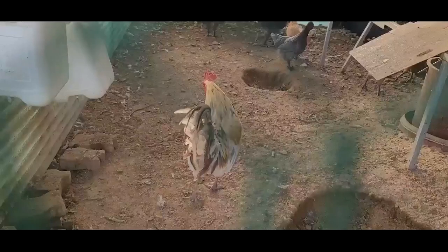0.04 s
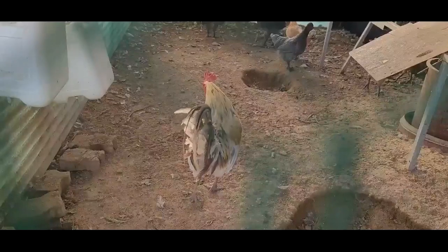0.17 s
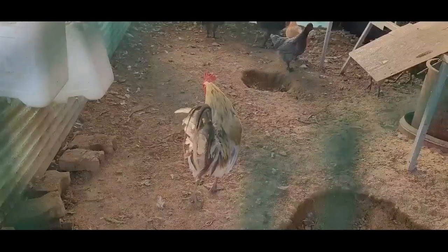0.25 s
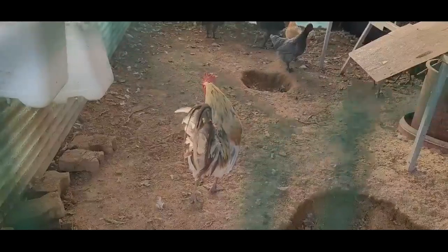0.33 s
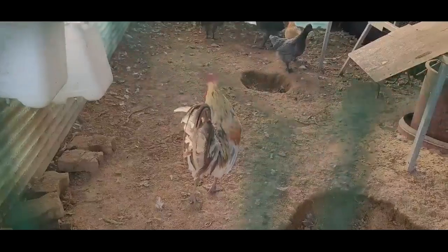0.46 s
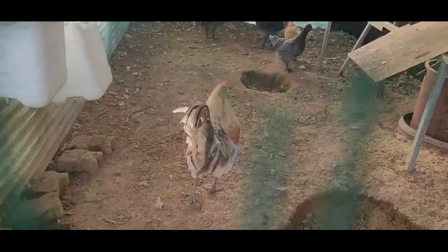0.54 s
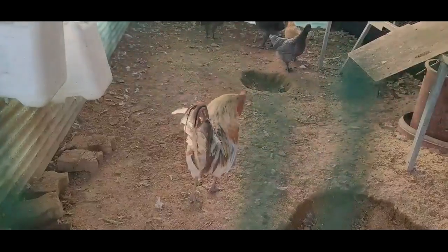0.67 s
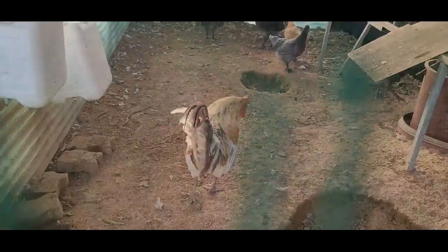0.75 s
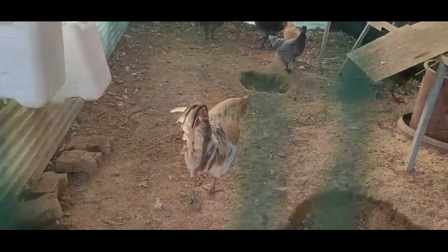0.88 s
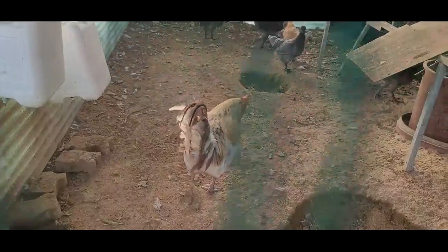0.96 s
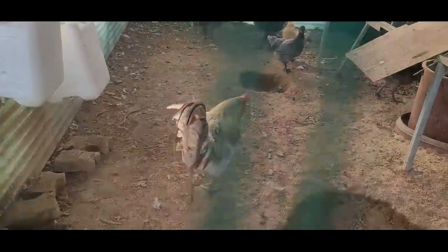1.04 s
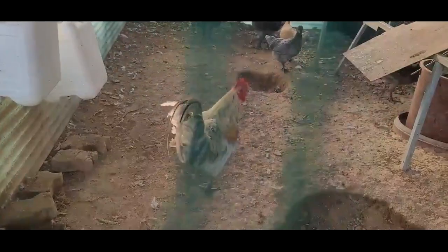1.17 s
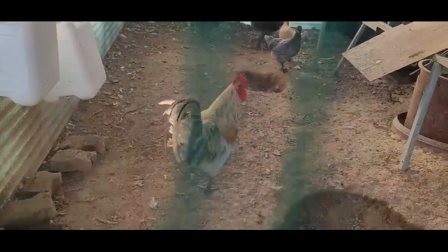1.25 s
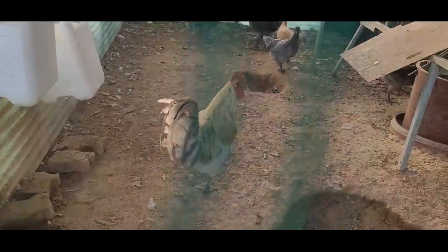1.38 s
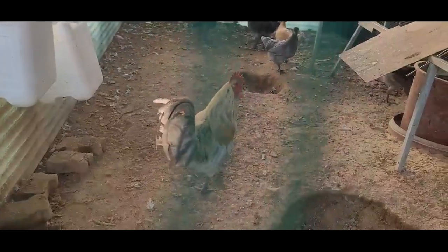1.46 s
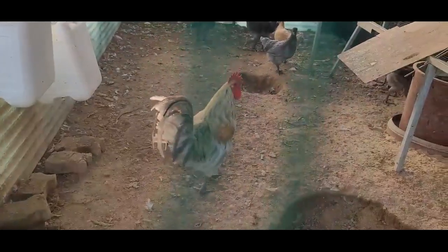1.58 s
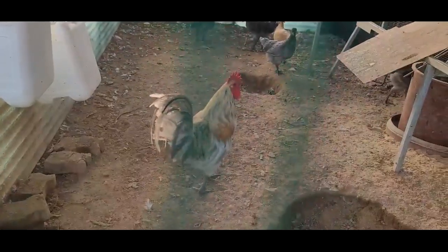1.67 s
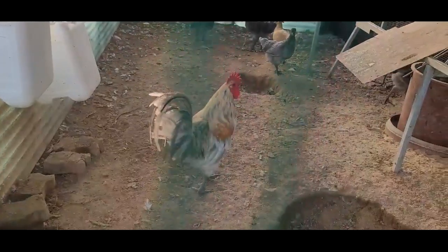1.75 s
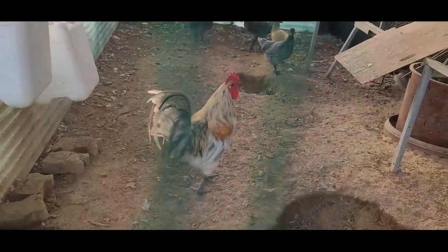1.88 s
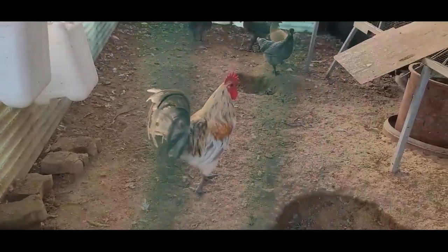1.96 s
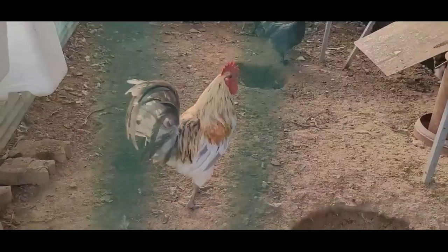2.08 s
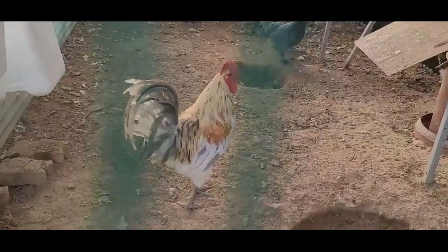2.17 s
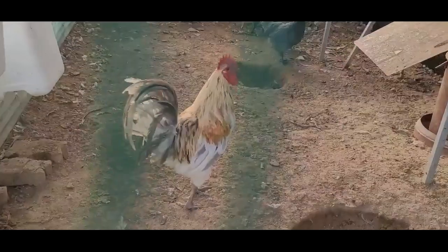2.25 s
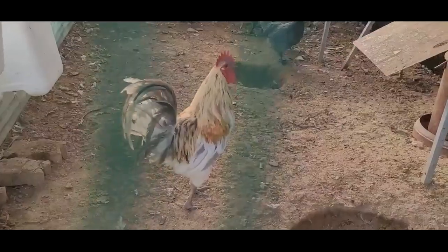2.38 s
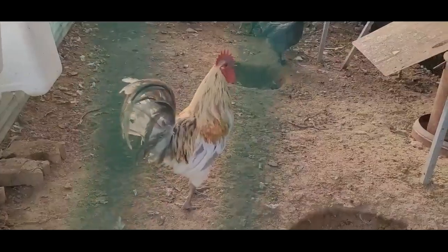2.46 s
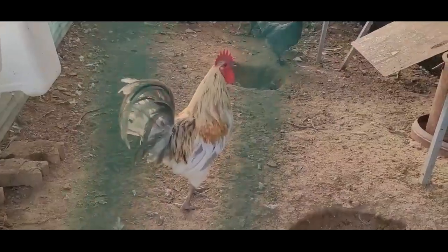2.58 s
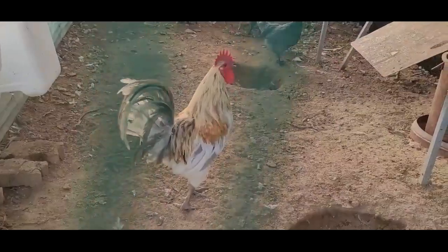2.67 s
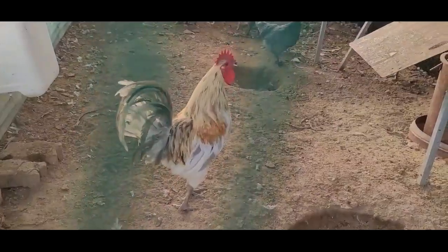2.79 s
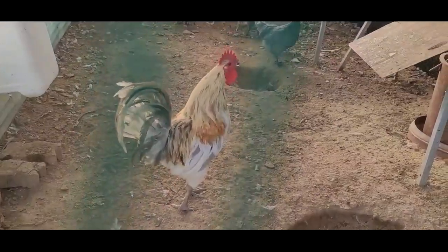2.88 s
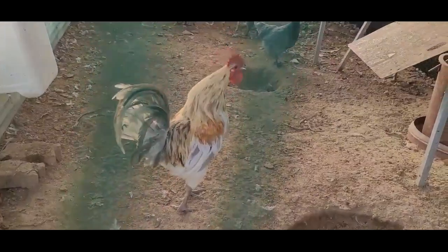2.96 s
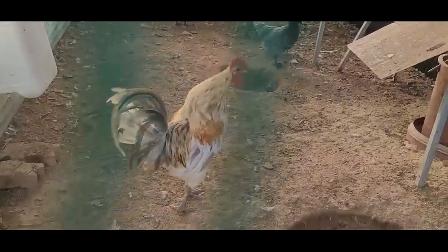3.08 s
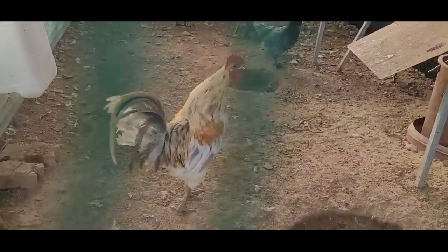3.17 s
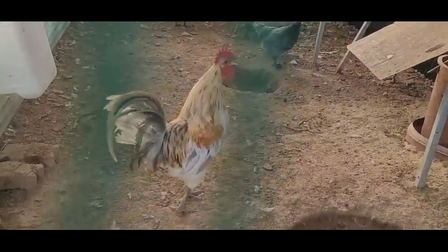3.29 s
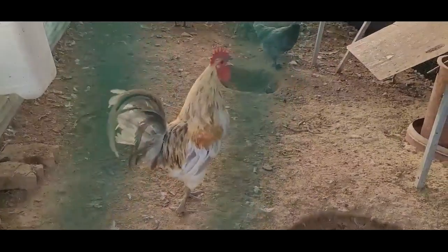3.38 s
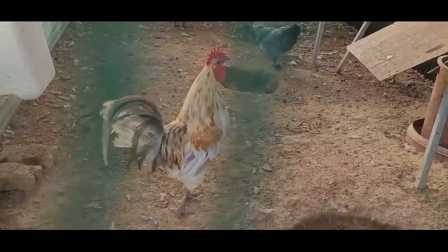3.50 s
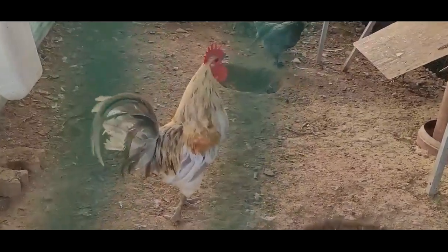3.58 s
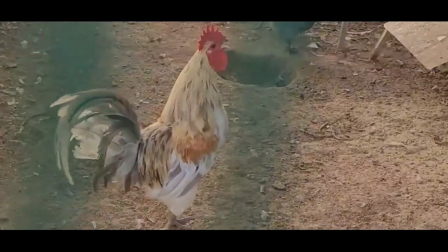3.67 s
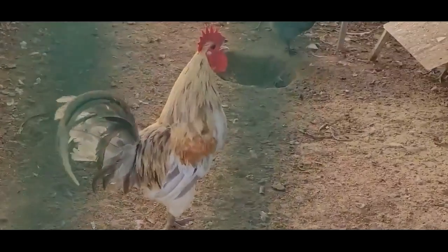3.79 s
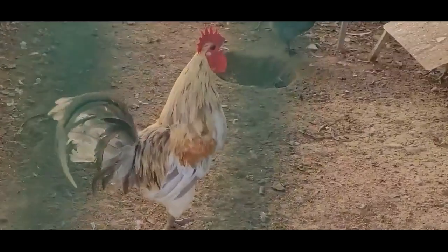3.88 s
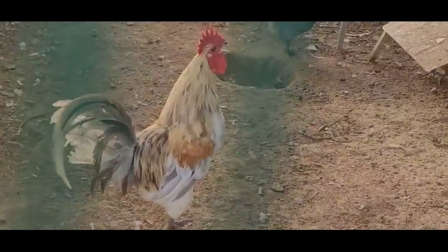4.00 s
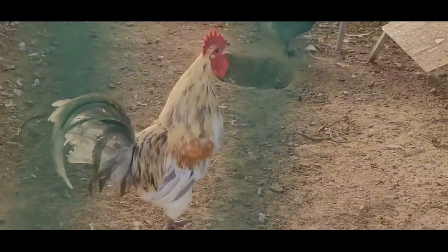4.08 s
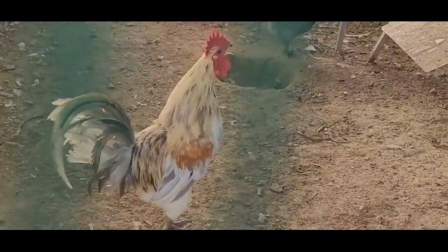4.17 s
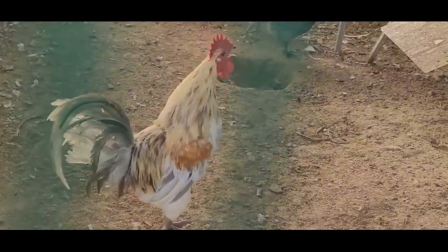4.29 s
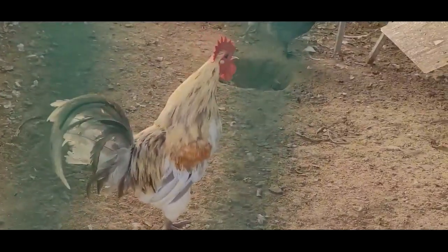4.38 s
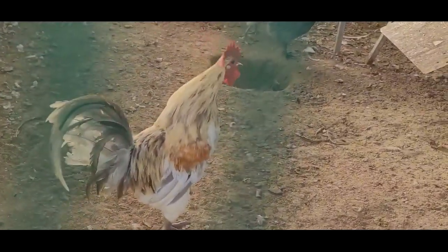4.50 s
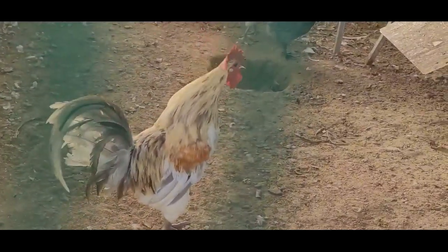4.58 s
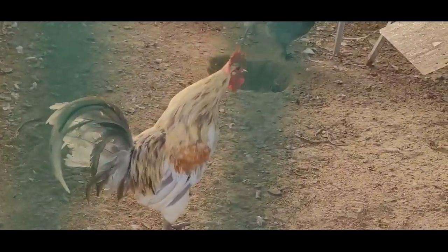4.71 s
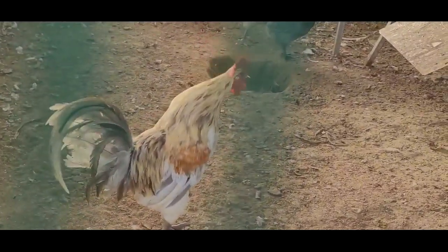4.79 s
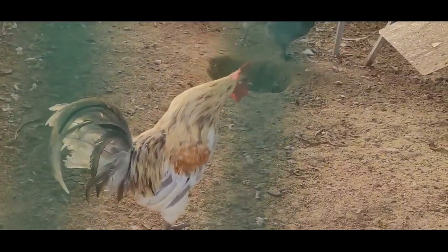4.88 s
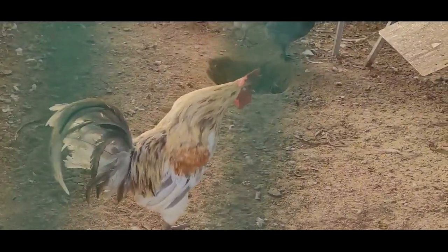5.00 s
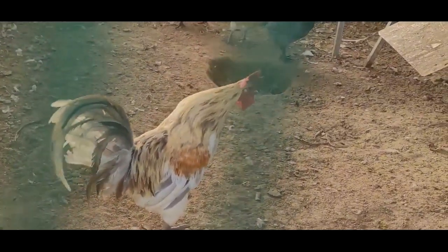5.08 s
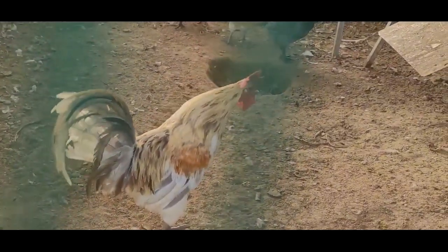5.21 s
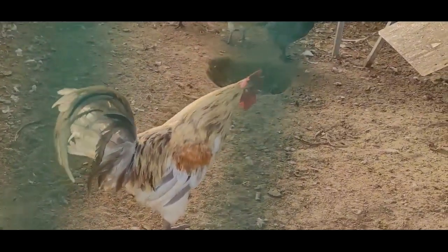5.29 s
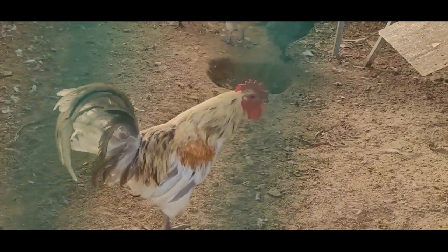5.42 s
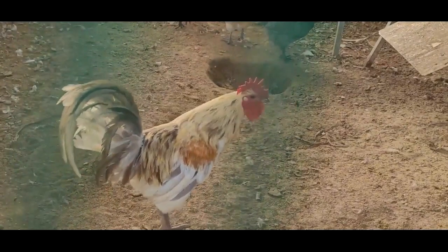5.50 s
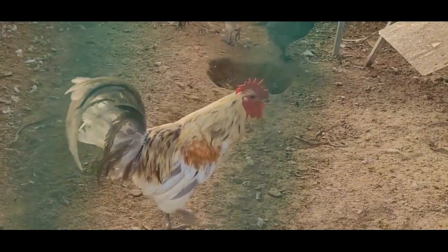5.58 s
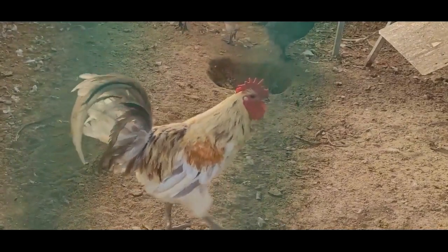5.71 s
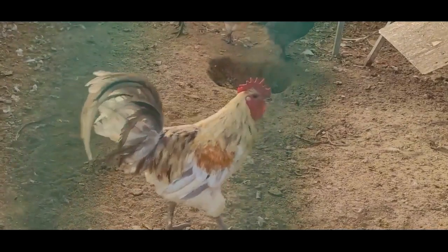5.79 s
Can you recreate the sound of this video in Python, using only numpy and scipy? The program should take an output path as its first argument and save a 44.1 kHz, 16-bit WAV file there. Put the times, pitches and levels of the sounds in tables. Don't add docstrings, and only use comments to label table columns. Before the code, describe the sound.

A hen clucks and squawks in a dirt pen, then a rooster lets out one loud hoarse crow that collapses into a rasp.

```python
import sys
import numpy as np
from scipy import signal
from scipy.fft import rfft, irfft
from scipy.io import wavfile
from scipy.ndimage import uniform_filter1d

SR = 44100
rng = np.random.default_rng(int(sys.argv[2]) if len(sys.argv) > 2 else 0)


def undo_db(level):
    steps = np.asarray(level, float) / 20
    return 10 ** steps


def dump_mix(stems):
    frames = np.atleast_2d(stems).T
    limited = np.clip(frames, -1, 1)
    pcm = np.round(limited * 32767).astype(np.int16)
    wavfile.write(sys.argv[1], SR, pcm)


N = 257984
CUTOFF_HZ = 15620
USUAL_DB = -20
AIR = 0.47


def rooster():
    # t/s, pitch/Hz, clean swing/dB, hoarseness against the swing/dB,
    # beak opening on the third line/dB
    crow_1 = [(3.106, 465, -67, -4, -3), (3.119, 508.5, -35, -5, 15), (3.143, 543, -25, -13, 21),
              (3.179, 561, -22.5, -24, 15), (3.21, 591.5, -18.5, -23, 0), (3.24, 586, -20, -13, -13.5),
              (3.284, 604.6, -18.5, -25, -7), (3.318, 588, -24.5, -18.5, 3), (3.364, 611, -45, -35, -5.5)]
    crow_2 = [(3.398, 697.7, -53.5, 6.5, -7.5), (3.412, 757.6, -29, 4, -10), (3.429, 823, -9.5, -22, 5),
              (3.482, 880, -8.5, -47, -11.5), (3.519, 892, -14, -28, 13.5),
              (3.553, 878.4, -13, -49.5, 16.5), (3.572, 791, -45.5, 10.5, 23.5), (3.624, 756, -25, -11, -3)]
    crow_3 = [(3.631, 853, -23, -6, 1), (3.66, 841.3, -19.5, -12.5, 0), (3.749, 824.5, -17.5, -20, -1.2),
              (3.77, 825, -17.5, -29, 2), (3.79, 837, -20, -43, -0.6), (3.81, 828, -22, -27.5, 2),
              (3.834, 818, -15, -27, -1.5), (3.87, 827, -15, -34, -1.49), (3.889, 814, -16.5, -23.5, -1)]
    crow_3_late = [(3.887, 829.6, -19.5, -30.5, -1), (3.928, 818.4, -14.5, -29, -1),
                   (3.956, 807, -27, -31, -4), (3.983, 810, -25, -42, 1), (4.026, 800, -30, -36, 7),
                   (4.053, 822, -14, -37, -1), (4.086, 823.5, -18, -36, 9.5),
                   (4.112, 813.4, -28, -16, 15.5), (4.127, 770, -42, -4, 18)]
    crow_4 = [(4.134, 774, -22.5, -16.5, -15.5), (4.204, 770.6, -37, 2, -4), (4.25, 776.4, -20, -24, -3),
              (4.303, 782.8, -20, -24, -5.5), (4.346, 774.2, -19.5, -29, -7), (4.43, 780.3, -21, -18, -6.5),
              (4.548, 784.2, -22.5, -8.5, -14), (4.614, 772, -19.5, -23, -12), (4.645, 766, -33, -9, -4)]
    crow_5 = [(4.63, 649.9, -36, 12.5, -7), (4.736, 629, -35.5, 11.5, 2), (4.844, 647.6, -27, 2, 18.5),
              (4.92, 631.9, -11.5, -12, 17), (4.997, 598, -25.5, 4, -21), (5.078, 585, -17, -11, -18),
              (5.1, 589, -42.5, 10.5, -3), (5.143, 595.4, -46.5, 17.5, 14.5), (5.191, 615, -64, 15.5, 0)]
    # f/Hz, width/Hz, level/dB
    crow_throat = [(693, 170, 4.5), (1420, 720, -1), (2640, 790, -7.5)]
    ending_throat = [(664.3, 188, 4), (1438.5, 505, -0.5), (2583, 480, -6.5)]
    # f/Hz, level per Hz/dB
    opening_top = [(1210, -63.5), (2050, -28), (2470, -6.5), (3230, -28), (3760, -11), (5230, -38),
                   (6850, -34.5), (12300, -47.5), (15400, -49)]
    crow_top = [(2500, -9), (3300, -3.5), (4120, 2), (4950, -9.5), (5770, -3), (7400, -13.5), (8250, -20),
                (9900, -23), (12300, -15), (15400, -27)]
    doubled_top = [(2700, -3), (3120, 1.5), (3500, -3.5), (3900, -0.5), (4300, -14), (4680, -5.5),
                   (5460, -15.5), (5850, -4.5), (6250, -15.5), (7000, -20.5), (8000, -13.5), (9300, -26),
                   (15400, -23)]
    ending_top = [(1710, -47), (2900, -5), (3730, 4), (5180, -13), (5950, -6.5), (9710, -17), (12300, -15),
                  (15400, -27.5)]
    # t/s, offset above the pitch/Hz, level/dB
    second_side = [(3.16, 43.93, -10), (3.199, 53, -1.5), (3.301, 51.4, 2), (3.34, 54, 2),
                   (3.36, 55.5, -56.5)]
    # multiple of the pitch, multiple of the gap, level/dB
    sum_tones = [(2, 1, -4), (3, 2, -18), (4, 3, -11)]
    # t/s, level/dB
    fifth_line = [(3.122, -48), (3.134, -21), (3.155, -39.5), (3.186, -22), (3.21, -44.5)]
    # t/s, pitch/Hz, level/dB
    split = [(4.645, 767.6, -28.5), (4.7, 752, -27), (4.76, 749.4, -25.5), (4.84, 717, -25.5),
             (4.89, 698, -30), (4.91, 677, -23)]
    # multiple of the pitch, level/dB
    split_lines = [(.87, -1), (1, -2), (1.5, -10), (1.83, -3), (2.0, 2), (2.2, -3), (2.32, -5.5), (3, -7.5),
                   (3.3, -3.5), (3.6, -7), (4.1, -10.5), (4.8, -16)]
    # t/s, third of the pitch/Hz, level/dB
    tripled = [(4.93, 202.3, -44), (4.955, 201.6, -31.5), (5.0, 198.7, -34), (5.05, 198.9, -24),
               (5.085, 195.4, -31.5), (5.11, 197.4, -44)]
    # multiple of that third, level/dB
    tripled_lines = [(4, -5), (6, -2), (7, 0), (8, 0.5), (9, -6), (12, -11.5), (13, -10), (14, -8)]
    # t/s, f/Hz, level/dB
    last_gasp = [(5.118, 880, -35), (5.135, 853, -35), (5.155, 845, -33.5), (5.175, 800, -45)]
    # t/s, f/Hz, level/dB
    voice_break = [(3.575, 613, -37), (3.605, 687, -20.5), (3.635, 684, -17.5), (3.67, 750, -30.5)]

    crow, first, turns = voice([("open", crow_1, 10, 0.65, 0, .0075, 3)],
                               crow_throat, opening_top, sputter_db=-0.5)
    gate, above_hz, side_db = in_time([np.array(second_side)])
    gap = np.cumsum(above_hz) / SR
    sums = [undo_db(db + 4 * drift(40)) * sine(k * turns + m * gap) for k, m, db in sum_tones]
    crow += gate * first * undo_db(side_db) * (sine(turns + gap) + sum(sums))
    gate, fifth_db = in_time([np.array(fifth_line)])
    crow += gate * undo_db(fifth_db + 3.7 * drift(80)) * sine(5 * turns)

    held = [("rise", crow_2, 12.5, .42, 0, .009, 3), ("hold", crow_3, 4.5, .83, 0, .0058, 3),
            ("hold", crow_3_late, 4, .92, 0, .004, 3), ("half", crow_4, -24, .97, 1, .0018, 3)]
    crow += voice(held, crow_throat, crow_top, doubled_top=doubled_top)[0]
    crow += undo_db(2.5 * drift(59)) * far_call([voice_break], [(1, 0)])
    crow += voice([("end", crow_5, 2, 0.55, 0, .007, 4)],
                  ending_throat, ending_top, fade=0.03, sputter_db=2.5)[0]
    crow += broken_lines(split, split_lines)
    crow += broken_lines(tripled, tripled_lines)
    return crow + broken_lines(last_gasp, [(1, -2.5), (1.07, -2)], flicker_db=10.5)


def voice(states, modes, top, fade=0.017, sputter_db=0, doubled_top=None):
    # t/s, rattle rise/dB, half length/s
    slips = [(3.814, 17, 0.0088), (3.896, 10, 0.011), (4.028, 28, 0.014), (4.091, -7.5, 0.021),
             (4.17, 30, 0.033)]
    # t of a crest/s, half length/s, rate/Hz, depth/dB
    throbs = [(3.458, 0.036, 40, 0.5), (3.728, 0.11, 43.3, 2.5), (4.439, 0.034, 40.2, 3)]
    time = np.arange(N) / SR
    rows = [np.array([[*row, *state] for row in partials(name, table)]) for name, table, *state in states]
    (gate, hz, db1, db2, db3, upper_db, between_db,
     rattle_db, clean, half, wobble, third) = in_time(rows, fade)
    turns = turns_of(hz, .55 * wobble)
    clean = np.clip(clean, 0, 1)
    half = half * (1 - np.exp(-((time - 4.325) / 0.04) ** 4))
    slips_db = sum(db * np.exp(-((time - s) / span) ** 2) for s, db, span in slips)
    throb_db = sum(db * np.cos(2 * np.pi * rate * (time - s)) * np.exp(-((time - s) / span) ** 4)
                   for s, span, rate, db in throbs)

    lines = undo_db(db1) * sine(turns)
    lines += undo_db(db2 - 0.13 * slips_db + throb_db) * sine(2 * turns)
    lines += undo_db(db3) * np.where(third > 3.5, sine(4 * turns), sine(3 * turns))
    between = undo_db(3 * drift(6)) * sine(1.5 * turns) + undo_db(3 * drift(6)) * sine(2.5 * turns)
    lines += half * undo_db(between_db) * (between + .07 * sine(turns / 2))
    lines *= undo_db(220 * wobble * np.tanh(drift(30)))
    upper = overtones(turns, hz * (gate > 0), top, half * undo_db(between_db + 36.5), wobble,
                      first=4 - half.any() / 2, count=30, rasp_db=531.0, blur=21, doubled_top=doubled_top)

    harsh = rattle(hz)
    chaos_db = between_db + rattle_db + slips_db
    low = undo_db(chaos_db) * rms_one(throat(harsh, modes, sputter_db))
    hiss = np.clip(undo_db(chaos_db - upper_db + 8), 45 * wobble, 1)
    hiss = hiss * rms_one(colour(harsh + AIR * rng.standard_normal(N), top))
    high = np.sqrt(clean) * upper + np.sqrt(1 - clean) * hiss
    brighter = undo_db(7.4 * np.exp(-((time - 4.96) / 0.046) ** 2)) - 1
    bright_band = signal.butter(2, (4770, 7060), "band", fs=SR, output="sos")
    high += brighter * signal.sosfilt(bright_band, high)
    return gate * (lines + low + undo_db(upper_db) * high), gate * undo_db(db1), turns


def partials(name, table):
    tone_db = {"open": (-20, -20, -29.5, -23), "rise": (-29.5, -22, -37.5, -32),
               "hold": (-22, -14.5, -41, -33.5), "half": (-25.5, -21.5, -18, -26.5),
               "end": (-20.5, -34.5, -38, -38.5), "squawk": (-39, -19.5, -41, -45)}
    follows = {"open": (1.24, 0.88, 1.27, 0.66), "rise": (1, 1, 0.66, 0.39),
               "hold": (0.46, 0.9, 0.15, 0.035), "half": (0.25, 0.36, 0.65, 0.91),
               "end": (0.89, 0.29, 0.42, 0.85), "squawk": (0.78, 1.3, 0.51, 1.53)}
    s, hz, swing_db, hoarse_db, beak_db = np.transpose(table)
    chaos_db = swing_db + hoarse_db
    breath_db = 10 * np.log10(undo_db(2 * swing_db) + undo_db(2 * (chaos_db + 10)))
    drives_db = [swing_db, swing_db, swing_db, breath_db]
    db1, db2, db3, upper_db = [level_db + share * (drive_db - USUAL_DB) for level_db, share, drive_db
                               in zip(tone_db[name], follows[name], drives_db)]
    return np.transpose([s, hz, db1, db2, db3 + beak_db, upper_db, chaos_db])


def overtones(turns, hz, top, half, wobble, first, count, rasp_db=300., blur=13., doubled_top=None):
    on = np.flatnonzero(hz > 0)
    out, power = np.zeros(N), 1e-12
    slow, fast = np.arange(0, N + 2000, 1800), np.arange(0, N + 2000, 200)
    for k in np.arange(first, count, .5 if half.any() else 1):
        line_hz = k * hz[on]
        gain = undo_db(np.where(half[on] > 0, at_hz(doubled_top or top, line_hz), at_hz(top, line_hz)))
        gain = gain * (half[on] if k % 1 else 1) * (line_hz < CUTOFF_HZ)
        fading = 3.5 * np.interp(on, slow, rng.standard_normal(len(slow)))
        rasp = np.interp(on, fast, rng.standard_normal(len(fast)))
        rasp = np.minimum(rasp_db * wobble[on], 3.5) * rasp
        slip = np.interp(on, fast, rng.standard_normal(len(fast))) / (2 * np.pi)
        slip = blur * k * wobble[on] * slip
        out[on] += gain * undo_db(fading + rasp) * sine(k * turns[on] + slip + rng.random())
        power = power + gain ** 2
    out[on] /= np.sqrt(power)
    return out


def rattle(hz):
    turns = np.cumsum(hz * undo_db(.12 * drift(150))) / SR
    pulses = np.diff(np.floor(turns), prepend=0)
    pattern = sum(drift(14) * sine(j * turns / 4 + rng.random()) for j in (0, 1, 1, 2))
    out = pulses * (pattern + .7 * rng.standard_normal(N))
    out /= np.sqrt(uniform_filter1d(out ** 2, size=700) + 1e-9)
    out += .35 * rng.standard_normal(N)
    return signal.sosfilt(signal.butter(6, 645, "high", fs=SR, output="sos"), out)


def throat(x, modes, sputter_db=0, rate=60):
    out = 0
    for k, (hz, width, level_db) in enumerate(modes):
        r = np.exp(-np.pi * width / SR)
        b = (1 - r * r) / 2 * np.array([1, 0, -1])
        a = [1, -2 * r * np.cos(2 * np.pi * hz / SR), r * r]
        catch = undo_db(sputter_db * np.tanh(drift(rate))) if sputter_db else 1
        ringing = signal.lfilter(b, a, signal.lfilter(b, a, x))
        out = out + (-1) ** k * undo_db(level_db) * catch * ringing
    return out


def broken_lines(table, orders, flicker_db=5.5, grain=420):
    gate, hz, level_db = in_time([np.array(table)], fade=0.0078)
    on, out = np.flatnonzero(gate), np.zeros(N)
    turns, steps = turns_of(hz, .006)[on], np.arange(on[0], on[-1] + grain, grain)
    for k, db in orders:
        catch = np.tanh(np.interp(on, steps, rng.standard_normal(len(steps))))
        out[on] += undo_db(db + flicker_db * catch) * sine(k * turns + rng.random())
    return gate * undo_db(level_db) * out


def hen():
    # t/s, pitch/Hz, clean swing/dB, hoarseness against the swing/dB, beak opening/dB
    squawk = [(1.308, 585, -48, 9.5, -9), (1.329, 590.3, -37, 16.5, -5), (1.35, 575.5, -38, 16, 11),
              (1.384, 561.4, -17, -6, 9), (1.408, 547.7, -29, 6, 12), (1.482, 522, -21.5, -2.5, -6),
              (1.5, 510, -27.5, -1, -11), (1.537, 489, -41.5, 5.5, -19)]
    # f/Hz, width/Hz, level/dB
    squawk_throat = [(666, 640, -2.5), (1160, 400, 3), (1570, 470, -3.5), (2300, 330, -21), (2630, 144, 3)]
    # f/Hz, level per Hz/dB
    hen_top = [(1120, -40), (1900, -25), (2150, -2.5), (2720, -1.5), (3070, -23), (3830, -9.5), (5580, -22),
               (6030, -16), (7780, -23), (8340, -22), (15400, -41.5)]
    # t/s, pitch/Hz, level/dB
    squawk_bands = [(1.325, 589, -44), (1.345, 585, -31), (1.39, 556.5, -37), (1.44, 538, -31.5),
                    (1.48, 527, -39.5), (1.52, 525, -49)]
    # multiple of the pitch, level/dB
    squawk_lines = [(4, -5), (4.5, -6), (5, -2), (7, -6.5), (7.5, -19), (11, -16)]
    out = clucks()
    out = out + undo_db(-25.5) * np.roll(out, int(0.058 * SR))
    squawking = [("squawk", squawk, -2.5, .6, 0, .012, 3)]
    out = out + voice(squawking, squawk_throat, hen_top, sputter_db=6.5)[0]
    return out + broken_lines(squawk_bands, squawk_lines)


def clucks():
    # t/s, hold/s, peak/dB, partial 2 f/Hz,
    # chest weight on partial 1/dB
    cluck_events = [
        (1.179, 0.0044, -23.5, 1272, -0.5),
        (1.314, 0.042, -21, 1449, -4),
        (1.669, 0.017, -23, 1369, 2),
        (1.891, 0.0024, -19.5, 1370, 1),
        (2.149, 0.0028, -22, 1317, -1),
        (2.448, 0.0029, -25, 1135, -1.5),
        (2.695, 0.0033, -15.5, 1404, 2),
        (2.931, 0.023, -22.5, 1321, -2),
        (3.581, 0.029, -27.5, 1392, -14),
        (5.332, 0.029, -24.5, 1462, -3),
    ]
    # f/Hz, width/Hz, level/dB
    hen_throat = [(690, 280, -4.5), (1136, 71, 11.5), (1392, 107, 10), (2290, 1380, -10), (2680, 630, -6.5)]
    # f/Hz, width/Hz, level/dB
    cluck_beak = [(2280, 460, 4), (3180, 330, 0.5), (3940, 120, -10.5), (5110, 150, -11.5)]
    # f/Hz, level per Hz/dB
    cluck_top = [(1030, -17.5), (1750, 5.5), (2350, -9), (2800, -5.5), (3200, -11.5), (3700, -9),
                 (4230, -15), (4760, -13.5), (5350, -13.5), (7710, -24.5), (12100, -45), (15400, -49)]
    # f/Hz, level on the upper partials/dB
    beak_ring = [(4400, -5), (3940, -10), (4200, -10.5), (4000, -5.5), (4350, -7.5), (4400, -8.5),
                 (4130, -2.5), (3970, -1.5), (4200, -4), (3920, -6)]
    # f/Hz, level per Hz/dB
    puff = [(120, -21), (200, -3.5), (480, 1), (700, -34)]
    tables = [cluck_rows(*row) for row in cluck_events]
    gate, hz, db2, db1, upper_db = in_time(tables, fade=0.0068)
    hz = uniform_filter1d(hz, size=900)
    db2 = uniform_filter1d(db2, size=500)
    turns, harsh = turns_of(hz / 2, 0.011), rattle(hz / 2)

    second = .7 * undo_db(2.5 * drift(90)) * sine(2 * turns) + 0.7 * rms_one(throat(harsh, hen_throat[1:3]))
    first = 0.059 * sine(turns) + 1.034 * rms_one(throat(harsh, hen_throat[:1]))
    first += undo_db(-18) * rms_one(colour(rng.standard_normal(N), puff))
    upper = .7 * overtones(turns, hz / 2 * (gate > 0), cluck_top, 0 * hz, 0.022 + 0 * hz, first=3, count=20)
    upper += 1.45 * rms_one(colour(harsh + AIR * rng.standard_normal(N), cluck_top))
    upper += 1.21 * rms_one(throat(harsh, cluck_beak, sputter_db=8.5, rate=7.1))
    rings = [np.array([[rows[0, 0], *ring], [rows[-1, 0], *ring]]) for rows, ring in zip(tables, beak_ring)]
    _, ring_hz, ring_db = in_time(rings)
    upper += 1.33 * undo_db(ring_db) * drift(160) * sine(turns_of(ring_hz, .012))
    return gate * (undo_db(db2) * second + undo_db(db1) * first + undo_db(upper_db) * upper)


def cluck_rows(s, hold, peak_db, hz, chest_db):
    start_db = np.array([-31.5, -13.5, -15.5])
    fall_db_per_s = np.array([470, 535, 391.5])
    tail_s = .06
    lift_db = 0.4 * (peak_db - USUAL_DB)
    rise = max(0.028 - 0.49 * hold, .005)
    top_db = np.array([peak_db, -24.5 + chest_db, -42.5 + lift_db])
    held_db = top_db + np.array([1, -2, 2.5])
    return np.array([[s, hz * 0.86, *(top_db + start_db)],
                     [s + .45 * rise, hz, *(top_db + 0.54 * start_db)],
                     [s + rise, hz, *top_db],
                     [s + rise + hold, hz, *held_db],
                     [s + rise + hold + tail_s, hz * 0.94, *(held_db - tail_s * fall_db_per_s)]])


def rustle():
    # t/s, level/dB
    scratch = [(2.272, -45), (2.43, -78)]
    gate, level_db = in_time([np.array(scratch)], fade=0.025)
    grains = rng.standard_normal(N) * undo_db(1.93 * drift(80))
    dull = [(300, -3.0), (600, 3.0), (1500, -17), (2600, -22), (5000, -33), (9000, -70)]
    return gate * undo_db(level_db) * rms_one(colour(grains, dull))


def walls(x):
    # f/Hz, level against the direct sound/dB
    width = [(60, -37), (150, -39), (380, -7), (950, -6), (2370, -5), (5960, 1.5), (14900, -3)]
    t = np.arange(SR // 3) / SR
    decay = undo_db(-60 * t / 0.093) + undo_db(-29 - 60 * t / 0.92)
    tails = rng.standard_normal((2, len(t))) * decay * (t > .002)
    front, side = [signal.fftconvolve(x, tail / np.linalg.norm(tail))[:N] for tail in tails]
    return x + undo_db(-13) * front + colour(side, width) * [[1], [-1]]


def far_birds():
    # t/s, length/s, first f/Hz, last f/Hz, level/dB
    far_crow = [(5.21, 0.248, 649, 673, -42), (5.44, 0.3, 669, 681, -39)]
    far_half = [(5.26, 0.11, 324.5, 365.6, -44.5), (5.36, 0.52, 327, 310, -53.5)]
    croon = [(2.2, 0.228, 205.8, 209.8, -58.5), (5.4, 0.3, 218.7, 230.6, -58.5)]
    far_clucks = [(.34, 0.085, 1033, 999, -53.5), (.53, 0.04, 1074, 1010, -55)]
    # t/s, length/s, level/dB
    insect = [(0.135, 0.35, -67.5), (1.596, 0.053, -70), (2.503, 0.26, -67)]
    crow = far_call(gliding_notes(far_crow), [(1, 0.0075)])
    crow = crow + far_call(gliding_notes(far_half), [(1, 0.0011)])
    hens = far_call(gliding_notes(croon), [(1, 7.1), (2, 4.5)])
    hens = hens + far_call(gliding_notes(far_clucks), [(.5, -2.5), (1, -0.5), (1.5, -7.5)])
    buzzes = [np.array([[s, db], [s + span, db]]) for s, span, db in insect]
    gate, level_db = in_time(buzzes, fade=0.026)
    buzz = rms_one(throat(rng.standard_normal(N), [(7350, 550, 0)]))
    return crow + hens + gate * undo_db(level_db) * buzz


def far_call(tables, orders):
    gate, hz, level_db = in_time([np.array(t) for t in tables], fade=0.021)
    turns = turns_of(hz, 0.0022)
    return gate * undo_db(level_db) * sum(undo_db(db) * sine(k * turns) for k, db in orders)


def gliding_notes(rows):
    at = np.array([0, 0.17, 1 - 0.19, 1])
    edge_db = np.array([-32, 0, 0, -32])
    return [np.transpose([s + span * at, first_hz + (last_hz - first_hz) * at, db + edge_db])
            for s, span, first_hz, last_hz, db in rows]


def yard_noise():
    # t/s, level/dB
    gusts = [(0.3, -43.5), (1.9, -43), (2.04, -48), (2.2, -42.5), (2.6, -43), (2.95, -40.5), (3.649, -46),
             (3.72, -38), (3.8, -46), (4.11, -45), (4.65, -42.5), (4.79, -53), (4.97, -42), (5.28, -47.5),
             (5.46, -47.5), (5.6, -52), (5.85, -43)]
    # t/s, lift of the murmur/dB
    stir = [(.8, 3), (2.1, 3), (5.3, 6.5), (5.6, 4.5)]
    # f/Hz, level per Hz/dB
    rumble_top = [(13, -35.5), (22, -6), (49, 1.5), (84, -5), (119, -13), (160, -20.5), (210, -15),
                  (350, -120)]
    # f/Hz, level per Hz/dB
    murmur_top = [(82, -44.5), (140, -10), (400, -9.5), (750, -15), (1500, -20.5), (2500, -31.5),
                  (4700, -32), (8000, -37.5), (9200, -53.5), (11500, -49), (15000, -58)]
    _, rumble_db = in_time([np.array(gusts)])
    murmur_db = -56 + 0.25 * (rumble_db - gusts[0][1]) + in_time([np.array(stir)])[1]
    duck = undo_db(np.interp(np.arange(N) / SR, (3.099, 3.6, 4.3, 4.8), [0, -7.5, -7.5, 0]))
    rumble = undo_db(rumble_db + 2.0 * drift(9.3)) * wide_noise(rumble_top, 30.0, 140)
    murmur = undo_db(murmur_db + drift(5)) * wide_noise(murmur_top, 160, 380)
    left, right = duck * (rumble + murmur)
    return np.array([undo_db(-1.0) * np.roll(left, 11), right])


def wide_noise(points, low, high):
    # f/Hz, likeness (0 to 1)
    likeness = [(60, 0.98), (180, 1), (550, 0.87), (1640, 0.11), (4960, 0.12), (14900, 0.089)]
    hz = np.maximum(np.arange(N // 2 + 1) * SR / N, 1)
    alike = np.clip(at_hz(likeness, hz), 0, 1)
    mid, side = rfft(rng.standard_normal((2, N))) * undo_db(at_hz(points, hz))
    size = np.sqrt(2 * np.sum(np.abs(mid[(hz > low) & (hz < high)]) ** 2)) / N
    both = np.sqrt(1 + alike) * mid + np.sqrt(1 - alike) * side * [[1], [-1]]
    return irfft(both, N) / size / np.sqrt(2)


def rms_one(x):
    return x / np.sqrt(np.mean(x ** 2) + 1e-20)


def in_time(tables, fade=0.008):
    t = np.arange(N) / SR
    gates = [np.interp(t, [r[0][0] - fade, r[0][0], r[-1][0], r[-1][0] + fade], [0, 1, 1, 0])
             for r in tables]
    s, *columns = np.concatenate(tables).T
    return [np.max(gates, axis=0)] + [np.interp(t, s, c) for c in columns]


def at_hz(points, hz):
    return np.interp(np.log(hz), np.log(np.array(points)[:, 0]), np.array(points)[:, 1])


def drift(rate):
    r = np.exp(-2 * np.pi * rate / SR)
    noise = rng.standard_normal(N + 20000)
    return rms_one(signal.lfilter([1], [1, -2 * r, r * r], noise)[20000:])


def colour(x, points):
    hz = np.maximum(np.arange(N // 2 + 1) * SR / N, 1)
    return irfft(rfft(x) * undo_db(at_hz(points, hz)), N)


def turns_of(hz, wobble):
    return np.cumsum(hz * (1 + wobble * drift(44))) / SR


def sine(turns):
    return np.sqrt(2) * np.sin(2 * np.pi * turns)


def scene():
    # t/s, left over right/dB
    bearing = [(1.2, -0.5), (1.6, 0.5), (2.9, 0), (3.2, -0.5), (3.5, -0.5), (3.9, -0.5), (4.4, .4),
               (4.9, 0), (5.4, 1)]
    far = far_birds()
    lean = undo_db(in_time([np.array(bearing)])[1] / 2 * [[1], [-1]])
    near = lean * walls(rooster() + hen() + far + rustle())
    return near + 0.2 * far * [[-1], [1]] + yard_noise()


def band_limit(x):
    return signal.sosfilt(signal.butter(12, 15540, fs=SR, output="sos"), x)


def record(dry):
    begun = np.clip((np.arange(N) / SR - .113) / 0.0044, 0, 1)
    rounded = 1.279 * np.tanh(dry * begun / 1.33)
    top_cut = signal.cheby2(12, 60, CUTOFF_HZ, fs=SR, output="sos")
    return band_limit(signal.sosfilt(top_cut, rounded))


dry = scene()
out = record(dry)
dump_mix(out)
```